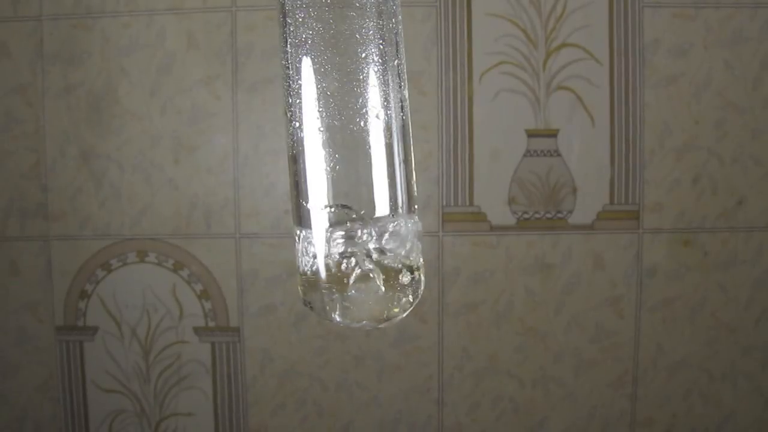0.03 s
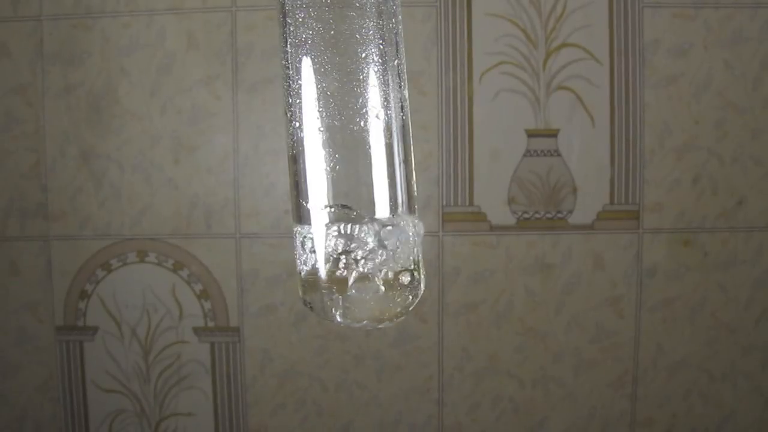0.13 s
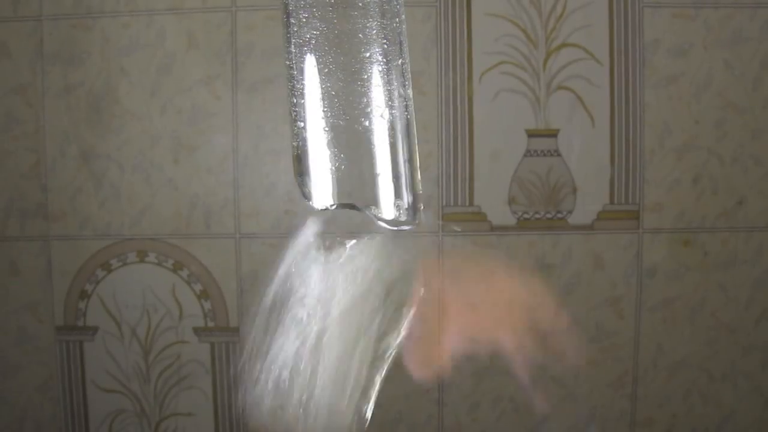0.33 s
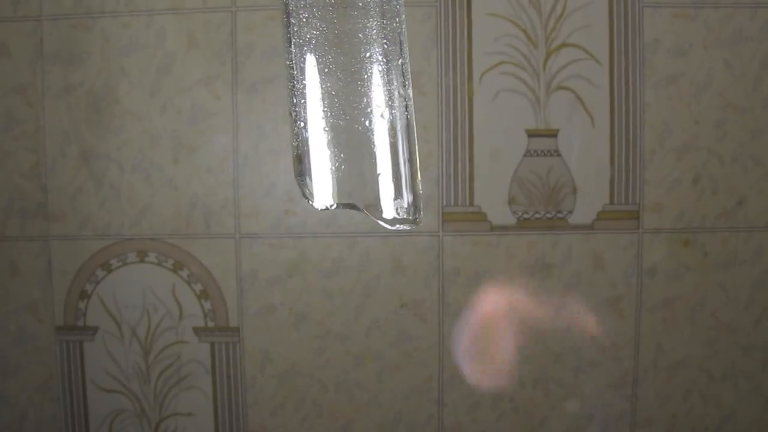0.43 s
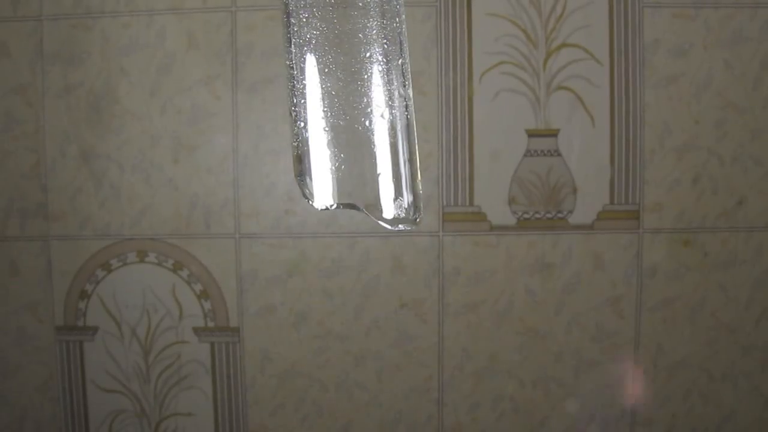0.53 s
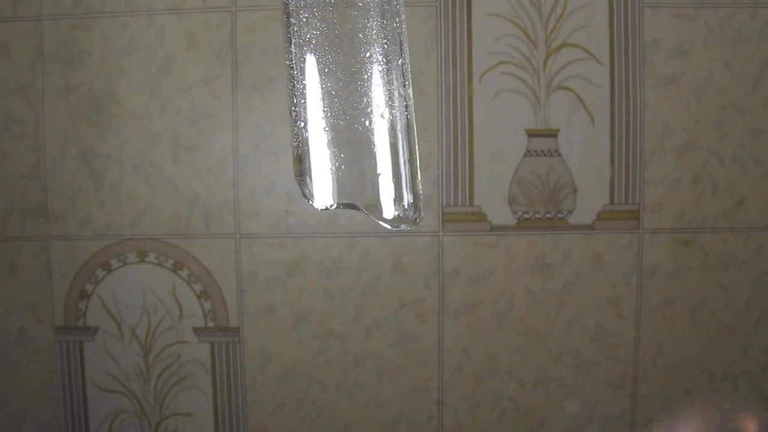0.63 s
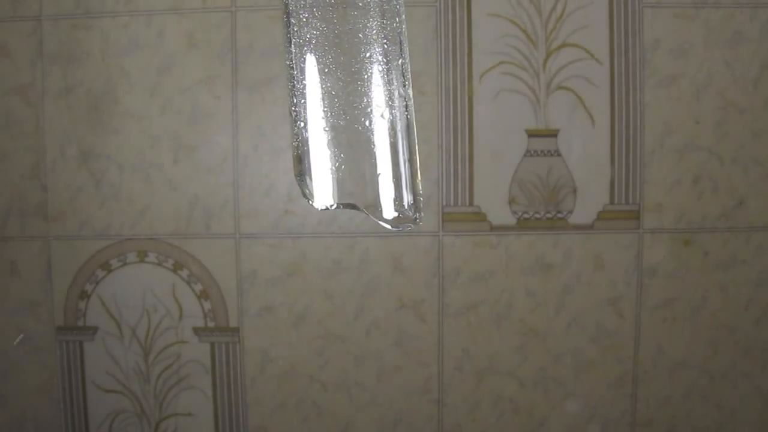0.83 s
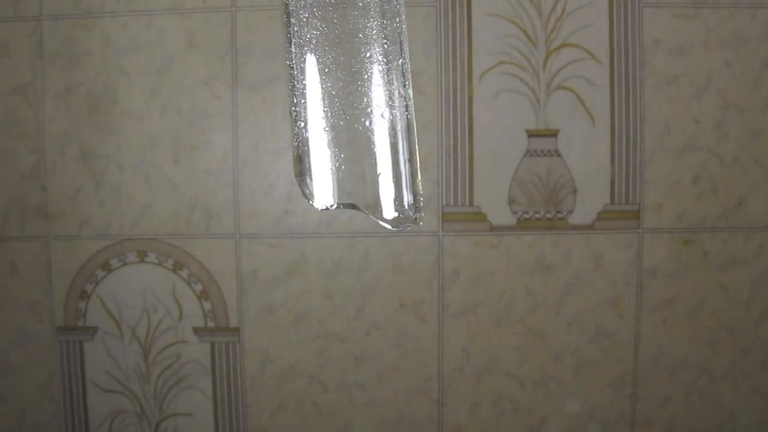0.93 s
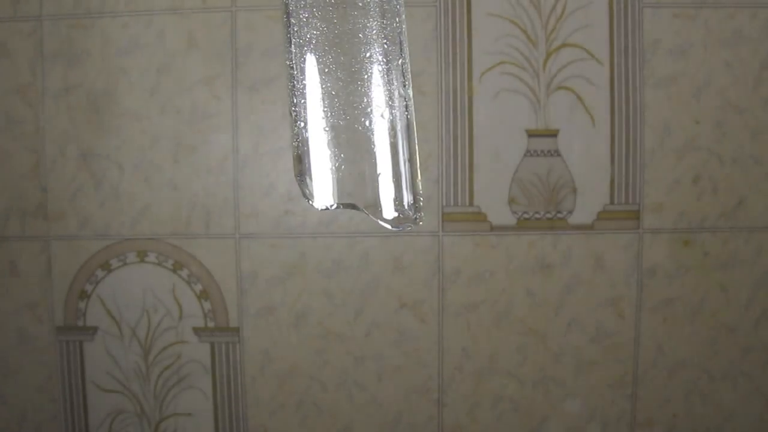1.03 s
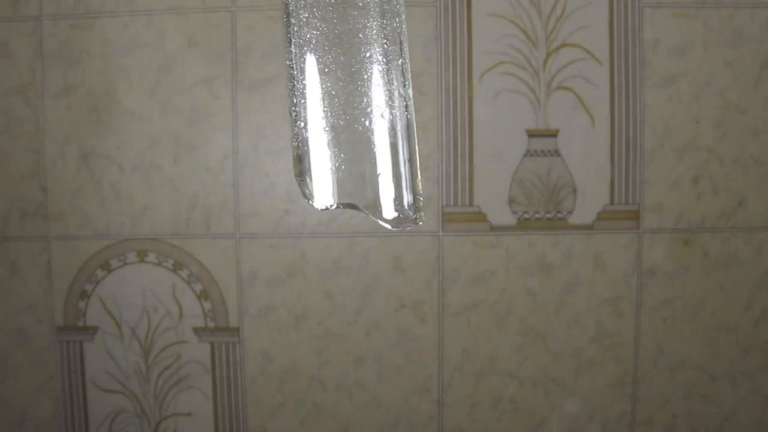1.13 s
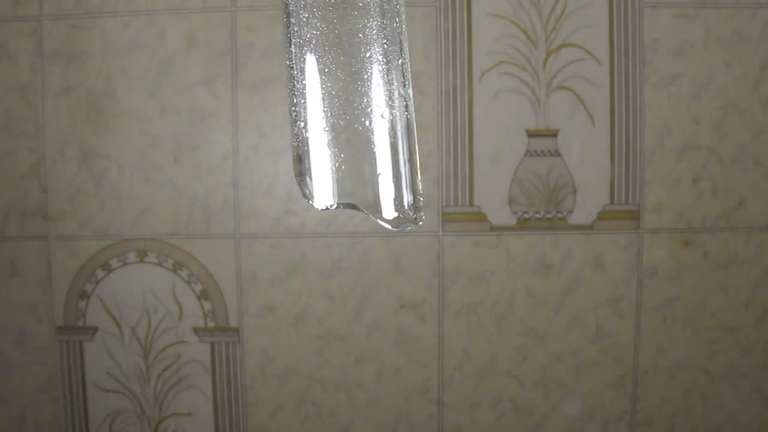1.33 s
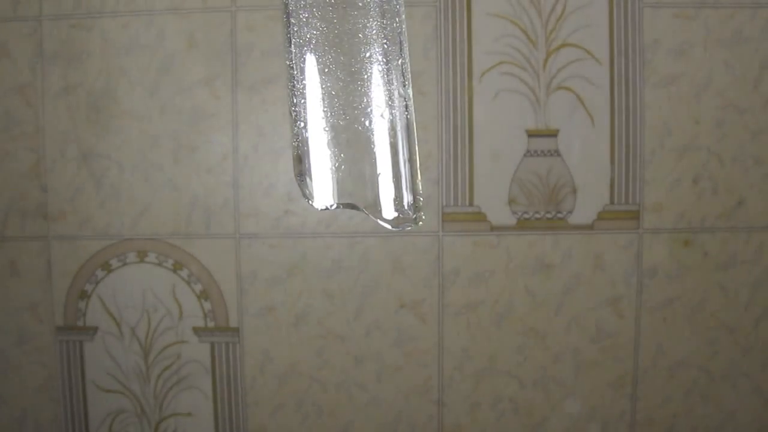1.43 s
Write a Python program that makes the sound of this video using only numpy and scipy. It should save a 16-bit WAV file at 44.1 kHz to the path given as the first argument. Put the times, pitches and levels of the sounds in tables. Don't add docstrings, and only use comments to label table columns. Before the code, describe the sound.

A heated glass tube bursts with a loud, hollow, slightly distorted pop after a brief hiss; its broken bottom clinks down, then a shard strikes the floor brightly and bounces in a small tiled room, close microphones.

```python
import sys
import numpy as np
from scipy import signal
from scipy.io import wavfile

SR = 44100
rng = np.random.default_rng(int(sys.argv[2]) if len(sys.argv) > 2 else 0)


def gain_from_decibels(decibels):
    exponent = np.asarray(decibels, float) / 20
    return 10 ** exponent


def generate_wav(signal):
    frames = np.transpose(np.atleast_2d(signal))
    scaled = np.clip(frames, -1, 1) * 32767
    pcm = np.round(scaled).astype(np.int16)
    wavfile.write(sys.argv[1], SR, pcm)


N = 66150

POP_S = 0.2465
# pitch_hz, likeness (0 to 1)
AIR_LIKENESS = [(60, 0.1), (240, 0.18), (950, 0.38), (3770, 0.12), (15000, 0.33)]
# start_s, level_db, contact_s
SHARD_HITS = [
    (.829, -22, 0.0055),
    (.8303, -12.5, 0.002),
    (.9402, -33, 0.0035),
    (1.0055, -44.5, 0.0017),
]


def at_hz(points, hz):
    pitches, values = np.array(points).T
    return np.interp(np.log(hz), np.log(pitches), values)


def rms_one(x):
    return x / np.sqrt(np.mean(x ** 2) + 1e-20)


def highpass(x, hz):
    return signal.sosfilt(signal.butter(2, hz, "high", fs=SR, output="sos"), x)


def wide(x, hz, ratio):
    limits = [hz / ratio, min(hz * ratio, SR / 2.2)]
    return signal.sosfilt(signal.butter(1, limits, "band", fs=SR, output="sos"), x)


def bands():
    edges = 14 * 2 ** np.arange(0, 10.6, .5)
    return [(np.sqrt(low * high), signal.butter(2, [low, high], "band", fs=SR, output="sos"))
            for low, high in zip(edges, edges[1:])]


def stereo_noise(spectrum, alike, shape):
    out = 0
    white = rng.standard_normal((2, 2, N + SR))
    for k, (hz, sos) in enumerate(bands()):
        mid, side = signal.sosfilt(sos, white[k % 2])[:, SR:]
        likeness = np.clip(at_hz(alike, hz), 0, 1)
        both = np.sqrt(1 + likeness) * mid + np.sqrt(1 - likeness) * side * [[1], [-1]]
        out = out + gain_from_decibels(at_hz(spectrum, hz)) * shape(hz) * both
    return out


def click_at(s):
    return np.arange(N) == int(s * SR)


def ring(x, hz, t60):
    r, w = gain_from_decibels(-60 / (t60 * SR)), 2 * np.pi * hz / SR
    return signal.lfilter([0, np.sin(w)], [1, -2 * r * np.cos(w), r * r], x + 1e-18)


def room():
    # pitch_hz, t60_s
    room_t60 = [(150, 0.26), (790, 0.25), (2090, 0.36), (5510, 0.18), (14600, 0.22)]
    # pitch_hz, likeness (0 to 1)
    room_likeness = [(300, 0.54), (1000, 0.63), (3000, .1)]
    t = np.arange(N) / SR

    def decay(hz):
        t60 = at_hz(room_t60, hz)
        return gain_from_decibels(-60 * t / t60) / np.sqrt(t60)

    tail = stereo_noise([(20, 0), (20000, 0)], room_likeness, decay)
    onset_s = 0.00067
    tail = highpass(tail, 162) * (1 - np.exp(-t / onset_s))
    return tail / np.sqrt(np.sum(tail ** 2) / 2)


def place(direct, room_feed, tail, pan_db, room_db, treble_db):
    lag_s = .00009
    echoes = signal.fftconvolve(tail, room_feed[None], axes=1)[:, :N]
    left, right = direct + gain_from_decibels(room_db) * echoes
    treble = highpass(left, 3900)
    late_treble = np.interp(np.arange(N) - lag_s * SR, np.arange(N), treble)
    left = gain_from_decibels(pan_db / 2) * (left - treble) + gain_from_decibels(treble_db) * late_treble
    return np.array([left, gain_from_decibels(-pan_db / 2) * right])


def gain_drop_db():
    recover_db_per_s = 7.5
    t = np.arange(N) / SR
    drop_db = 0
    for s, db in [(POP_S, 19.5), (SHARD_HITS[0][0], 3.5)]:
        drop_db = drop_db + np.maximum(db - recover_db_per_s * (t - s), 0) * (t > s)
    return drop_db


def background():
    # pitch_hz, level_db (per Hz)
    hiss_tone = [(59, -31), (100, -1.5), (492, -11.5), (991, -17), (1150, -17), (2080, -12), (2750, -14),
                 (6420, -13), (16000, -18)]
    # pitch_hz, level_db (per Hz)
    quiet_tone = [(59, -32), (100, -8.5), (389, -15.5), (442, -13.5), (691, -29.5), (854, -10.5),
                  (1150, -22), (6020, -26.5), (16000, -47)]
    # pitch_hz, level_db (per Hz)
    rumble_tone = [(8.8, -31), (15, -1), (54, -1), (81, -17), (146, -25.5), (200, -24), (260, -54),
                   (440, -120)]
    t = np.arange(N) / SR
    before, after = t < POP_S, t > POP_S
    drop_db = gain_drop_db()
    hiss = rms_one(stereo_noise(hiss_tone, AIR_LIKENESS, lambda hz: hz > 100))
    quiet = rms_one(stereo_noise(quiet_tone, AIR_LIKENESS, lambda hz: hz > 100))
    rumble = rms_one(stereo_noise(rumble_tone, AIR_LIKENESS, lambda hz: hz < 100))
    quiet_db = -64.5 + drop_db[int(.67 * SR)]
    swell_db_per_s = 4
    rumble = gain_from_decibels(-45.5 + swell_db_per_s * after * t) * rumble
    return gain_from_decibels(-48.5) * before * hiss + gain_from_decibels(-drop_db) * (gain_from_decibels(quiet_db) * after * quiet + rumble)


def liquid_fizz():
    start_s, level_db, pitch_hz = 1.448, -53.5, 3980
    noise = wide(rng.standard_normal((2, N)), pitch_hz, 1.77)
    return gain_from_decibels(level_db) * (np.arange(N) / SR > start_s) * wide(noise, pitch_hz, 1.65)


def hand_bumps():
    bump_times = [
        1.295,
        1.311,
    ]
    return gain_from_decibels(-35) * sum(ring(click_at(s), 183, 0.041) for s in bump_times)


def contact_colour(tone):
    unit = np.eye(1, 4096)[0]
    colour = 0
    for k, (hz, sos) in enumerate(bands()):
        colour = colour + gain_from_decibels(at_hz(tone, hz)) * (-1) ** k * signal.sosfilt(sos, unit)
    colour = highpass(colour, 281)
    return colour / np.abs(colour).max()


def struck(events, modes, tone, ring_db, flurry_db):
    clicks_per_s, click_spread_db, strength_spread = 4400, 0.5, .15
    t = np.arange(N) / SR
    contact, blows = np.zeros(N), np.zeros(N)
    for s, db, contact_s in events:
        contact += gain_from_decibels(db) * (t >= s) * np.exp(-np.maximum(t - s, 0) / contact_s)
        blows[int(s * SR) + 1] = gain_from_decibels(db)
    uneven_db = click_spread_db * np.minimum(rng.exponential(1, N), 3)
    sizes = gain_from_decibels(flurry_db + uneven_db) * rng.choice([-1, 1], N)
    flurry = contact * (rng.random(N) < clicks_per_s / SR) * sizes
    blow, rattle = signal.fftconvolve([blows, flurry], [contact_colour(tone)], axes=1)[:, :N]
    rings = 0
    for hz, db, t60 in modes:
        strength = rng.uniform(1 - strength_spread, 1 + strength_spread, N)
        rings = rings + gain_from_decibels(db) * ring(blows * strength, hz, t60)
    rings = gain_from_decibels(ring_db) * rings
    direct = 0.25 * blow + rattle + rings
    room_feed = blow + 0.2 * rattle + 0.21 * rings
    return direct, room_feed


def rocking_pieces(tail):
    # start_s, level_db, contact_s
    taps = [(.7338, -52.5, 0.0071), (.7558, -48.5, 0.0072), (.779, -53.5, 0.0022), (.801, -71, 0.0026),
            (1.006, -57.5, 0.014), (1.074, -43.5, 0.014), (1.088, -55, 0.016), (1.1364, -45.5, 0.033),
            (1.1853, -47.5, 0.0093), (1.2046, -41, 0.015), (1.25, -49.5, 0.026), (1.268, -48.5, 0.0084),
            (1.2949, -47, 0.0074), (1.3465, -43.5, 0.018), (1.385, -55, 0.0049), (1.41, -57.5, 0.04)]
    # pitch_hz, level_db, t60_s
    piece_modes = [(734, 8, .02), (1020, -8, 0.019), (1200, -17, 0.027), (1600, -38, .02),
                   (2390, 19.5, 0.018)]
    # pitch_hz, level_db (per Hz)
    tap_tone = [(120, -24), (200, -1.5), (315, -10.5), (385, -4.5), (575, -1.5), (1190, 4.5), (2420, -11),
                (5200, -16), (15500, -43)]
    direct, room_feed = struck(taps, piece_modes, tap_tone, ring_db=-21, flurry_db=-2)
    return place(direct, room_feed, tail, pan_db=-8, room_db=12.5, treble_db=-3)


def bouncing_shard(tail):
    # pitch_hz, level_db, t60_s
    shard_modes = [(590, -23, .3), (1505, -13, .12), (1710, -8, .2), (2314, -11, .15), (2380, -5, .18),
                   (3368, -10, .25), (3463, -5, .25), (3953, -8, .2), (4189, -8, .15), (5130, -6, .1),
                   (5654, -9, .12), (8300, -8, .08), (14240, -2, .08), (14450, -4, .08)]
    # pitch_hz, level_db (per Hz)
    shard_tone = [(88, -58), (150, -43), (941, -12), (1690, -9), (1900, -9), (2310, -11.5), (6640, 10),
                  (14200, -14.5), (16000, -12)]
    direct, room_feed = struck(SHARD_HITS, shard_modes, shard_tone, ring_db=-15.5, flurry_db=1.5)
    return place(direct, room_feed, tail, pan_db=-7.5, room_db=13.5, treble_db=0)


def landing_bottom(tail):
    # start_s, level_db, contact_s
    landings = [
        (.3882, -38, 0.0025),
        (.3897, -17, 0.0017),
    ]
    # pitch_hz, level_db, t60_s
    bottom_modes = [(771, -10, .3), (750, -14, .28), (807, -16, .15), (1472, -9, .1), (1680, -9, .1),
                    (1808, -5, .15), (2110, -9, .1), (2200, -9, .1), (2627, -6, .1), (2693, -6, .1),
                    (2761, -3, .12), (2810, -7, .1), (2893, -8, .08), (5970, -14, .08)]
    # pitch_hz, level_db (per Hz)
    bottom_tone = [(88, -51.5), (150, 3.5), (572, -46.5), (781, 1.5), (1630, -3.5), (2810, 0.5),
                   (6110, -10), (14100, -42.5), (15500, -41)]
    direct, room_feed = struck(landings, bottom_modes, bottom_tone, ring_db=-8.5, flurry_db=2.5)
    return place(direct, room_feed, tail, pan_db=-8, room_db=10, treble_db=-4)


def steam_leak():
    start_s, level_db, rise_db = 0.21, -31.5, 24.5
    t = np.arange(N) / SR - POP_S
    rise = np.clip(1 + t / (POP_S - start_s), 0, 1)
    leaking = (rise > 0) * (t < 0)
    return gain_from_decibels(level_db - rise_db * (1 - rise)) * leaking * wide(rng.standard_normal(N), 3350, 1.6)


def air_burst():
    tube_hz, opening_drop_hz, opening_s = 1062, 740, .0018
    rise_s, burst_s, tube_db, tube_t60_s = .0004, .0019, -8.5, .055
    # pitch_hz, level_db, t60_s
    overtones = [(2900, -26, .02), (4797, -36, .015), (1500, -30, .015), (2200, -34, .015)]
    t = np.arange(N) / SR - POP_S
    after = np.maximum(t, 0)
    pitch_hz = tube_hz - opening_drop_hz * np.exp(-(after / opening_s) ** 2)
    phase = 2 * np.pi * np.cumsum(pitch_hz * (t > 0)) / SR
    strength = np.exp(-(after / burst_s) ** 2) + gain_from_decibels(tube_db - 60 * after / tube_t60_s)
    air = -np.sin(phase) * (1 - np.exp(-after / rise_s)) * strength
    opened = click_at(POP_S + opening_s)
    return air + sum(gain_from_decibels(db) * ring(opened, hz, t60) for hz, db, t60 in overtones)


def glass_crack():
    level_db, t60_s = -11.5, 0.011
    t = np.arange(N) / SR - POP_S
    fade = gain_from_decibels(level_db - 60 * np.maximum(t, 0) / t60_s) * (t > 0)
    return fade * wide(rng.standard_normal(N), 7430, 1.49)


def bursting_tube(tail):
    burst = gain_from_decibels(1.0) * air_burst() + glass_crack() + steam_leak()
    return place(burst, burst, tail, pan_db=-5.0, room_db=-13, treble_db=2.5)


def scene():
    tail = room()
    surroundings = background() + liquid_fizz() + hand_bumps()
    pieces = rocking_pieces(tail) + bouncing_shard(tail) + landing_bottom(tail)
    return surroundings + pieces + bursting_tube(tail)


def band_limit(x):
    return signal.sosfilt(signal.butter(12, 16530, fs=SR, output="sos"), x)


def record(dry):
    clipped = np.clip(dry, -0.94, 0.94)
    top_cut = signal.cheby2(12, 70, 16700, fs=SR, output="sos")
    return band_limit(signal.sosfilt(top_cut, clipped))


dry = scene()
out = record(dry)
generate_wav(out)
```